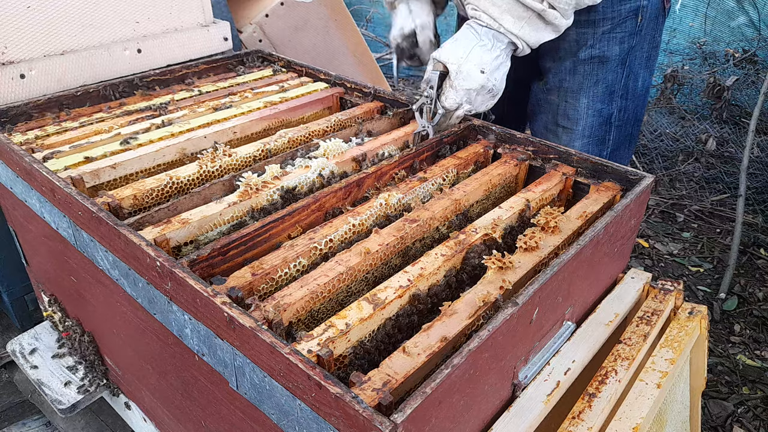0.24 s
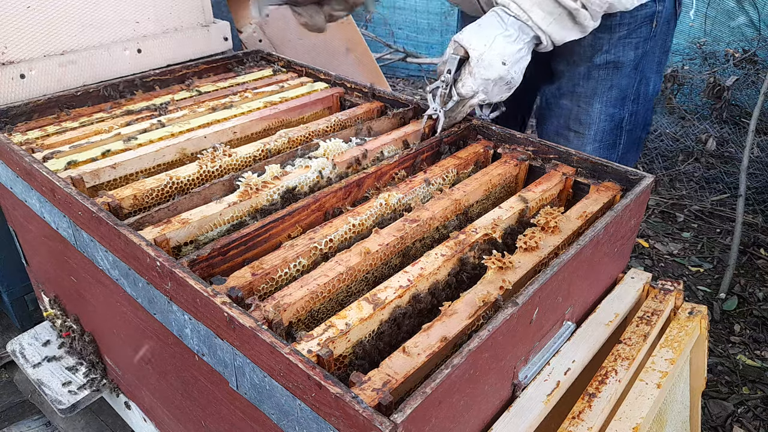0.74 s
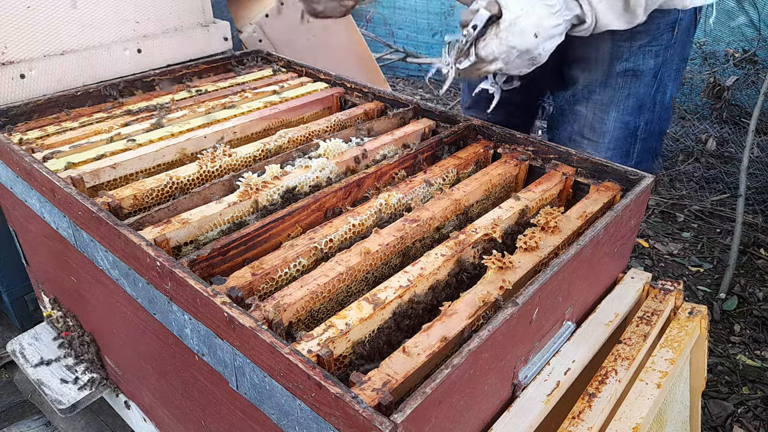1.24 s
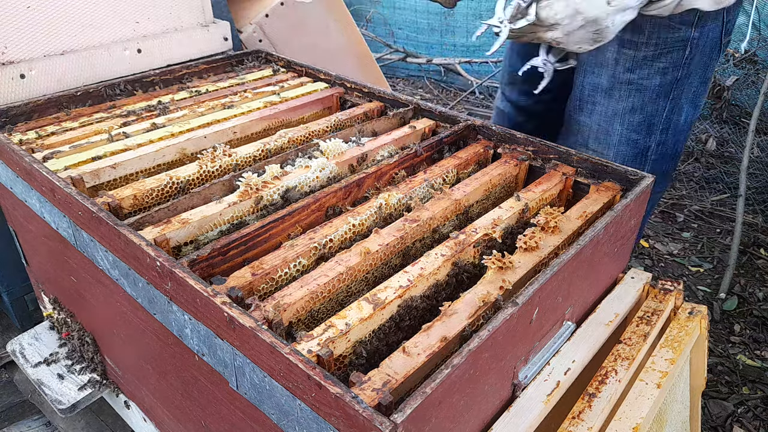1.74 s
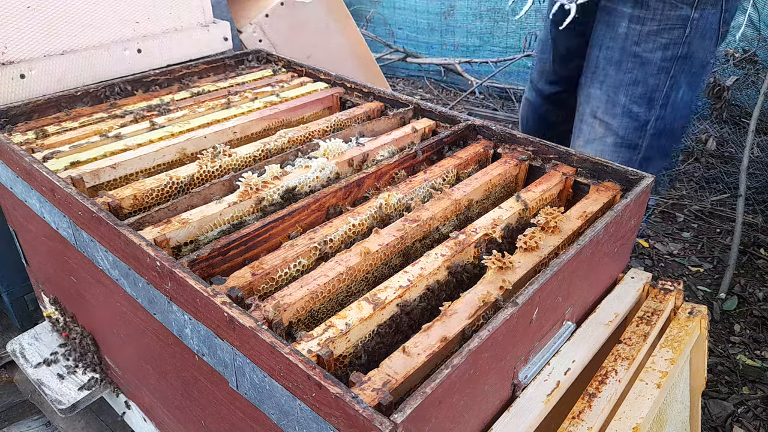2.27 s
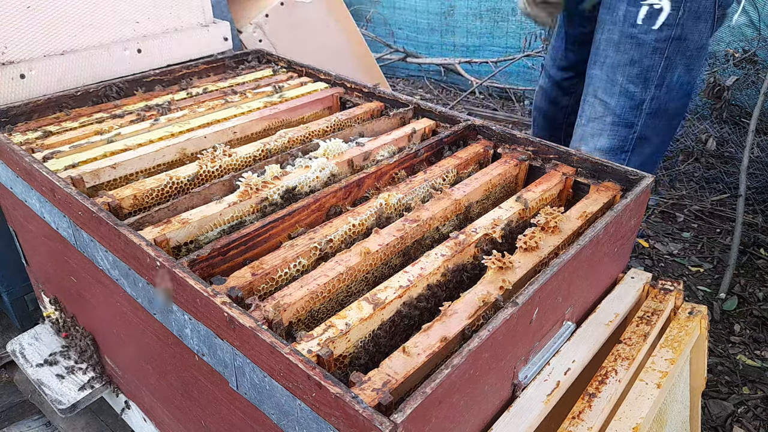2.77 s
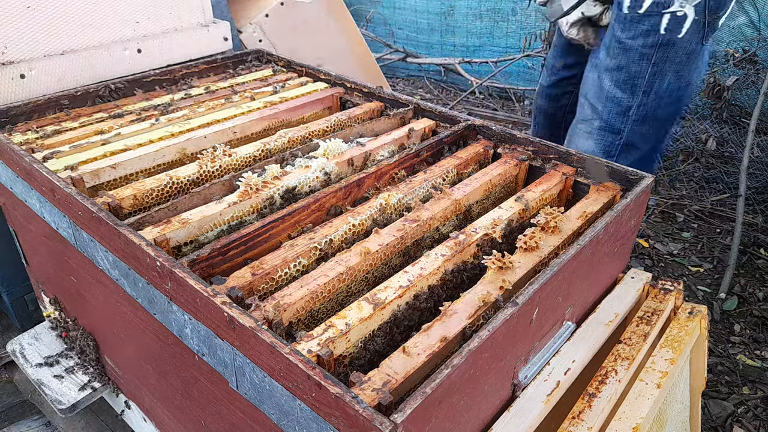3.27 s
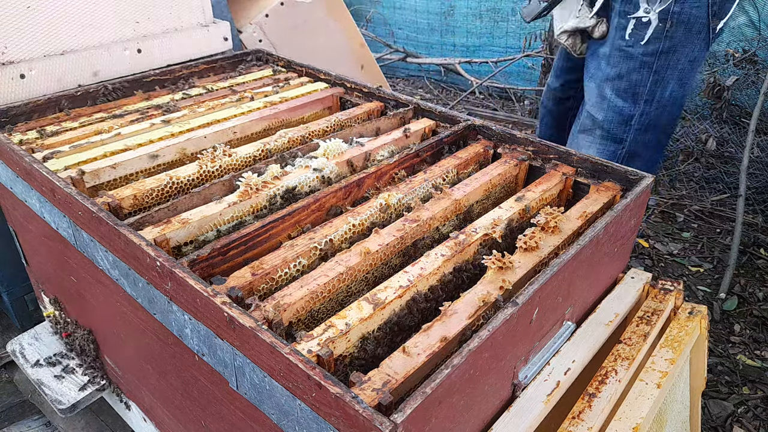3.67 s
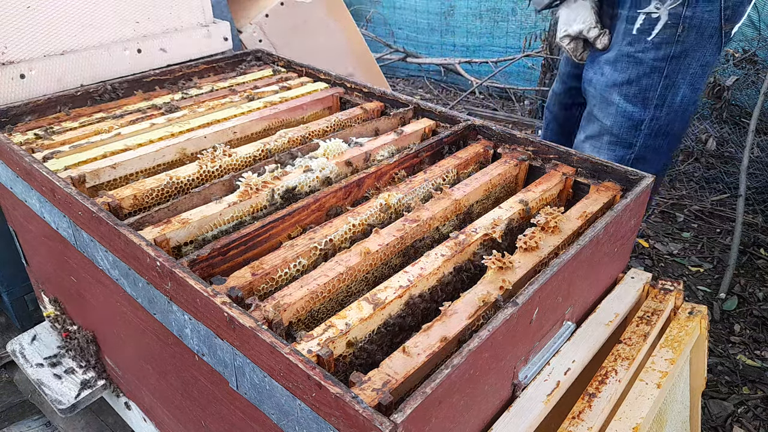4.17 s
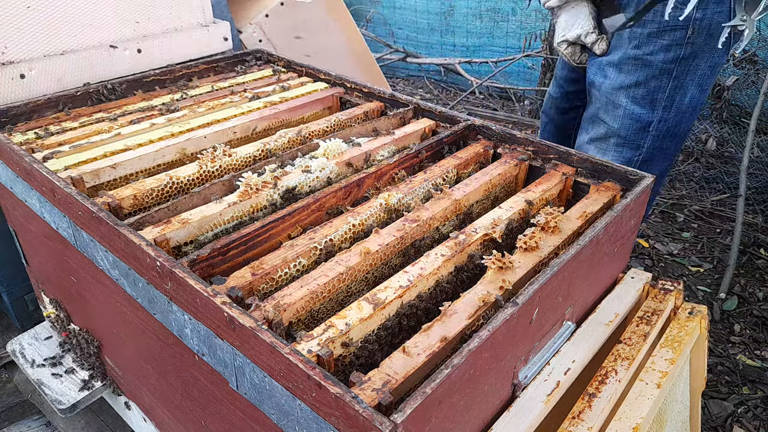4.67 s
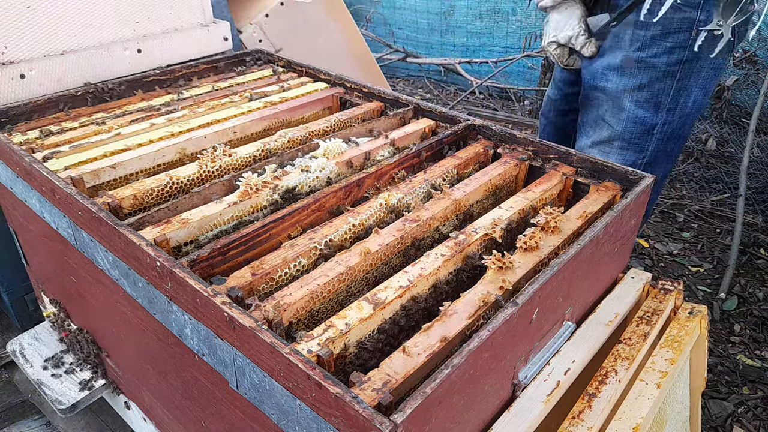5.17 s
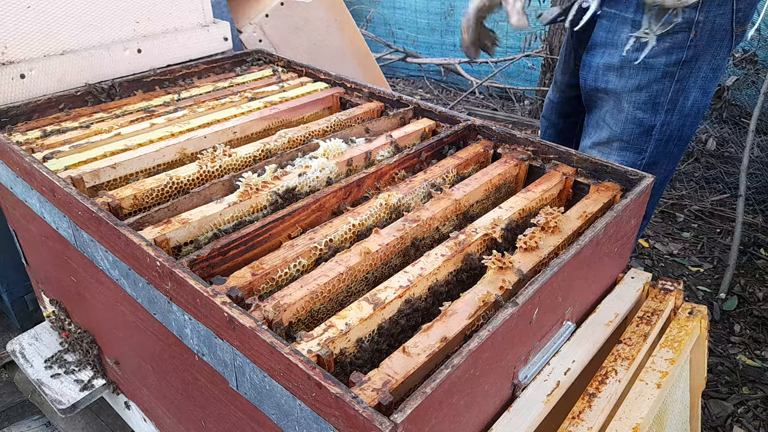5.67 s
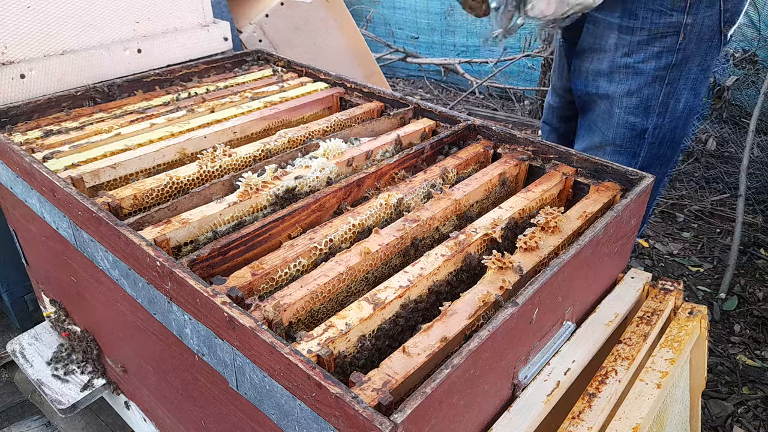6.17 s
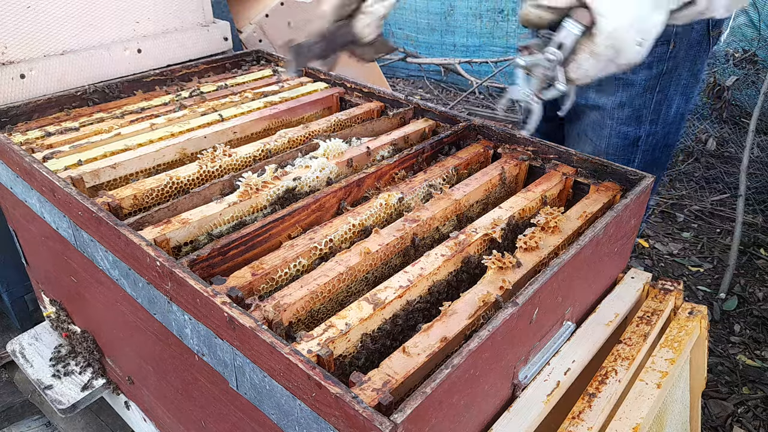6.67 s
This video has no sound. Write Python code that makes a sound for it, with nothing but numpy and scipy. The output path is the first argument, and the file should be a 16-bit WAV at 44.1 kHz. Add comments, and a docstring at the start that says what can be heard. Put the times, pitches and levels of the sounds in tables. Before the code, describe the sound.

Honey bees hum softly and unevenly around an open garden hive throughout, over faint outdoor air and scattered, distant sparrow chirps. At about 0.4 seconds come a few light, dry wooden taps with a faint glove rub. From 1.5 to 2.7 seconds one bee circles very close on the left, her buzz wavering and surging. Wood knocks at 1.7 and, more sharply, at 2.3 seconds. Her wings fan the microphone with short puffs at 2.0 and 2.2 seconds, then a rough, fluttering blast at 2.4, by far the loudest moment. Everything then drops in level for over a second and gradually recovers by about 5 seconds. During the dip, a thinner buzz hovers very faintly on the left. Around 6.4 seconds gloves rub and a steel tool gives a quick cluster of light, bright clinks. The right side sounds muffled throughout.

```python
"""A garden, beside an open hive, on a stereo recorder whose right port is muffled.
The colony hums with many beating wings, sparrows chirp far off and a lone bee hovers a little way away.
The keeper knocks wood and clinks a steel frame grip, gloves rubbing on both.
One bee circles the left microphone port and three times fans it with the wash of her wings.
Her closest pass makes the recorder turn its gain down for over a second."""
import sys
import numpy as np
from scipy import signal
from scipy.fft import rfft, irfft, next_fast_len
from scipy.io import wavfile
from scipy.ndimage import uniform_filter1d, minimum_filter1d

SR = 44100
rng = np.random.default_rng(int(sys.argv[2]) if len(sys.argv) > 2 else 0)


def store_pcm(level_fs):
    """Save levels as 16-bit WAV."""
    pcm = np.round(np.clip(level_fs, -1, 1) * 32767).astype(np.int16)
    wavfile.write(sys.argv[1], SR, np.atleast_2d(pcm).T)


N = 305392
TIME = np.arange(N) / SR


def from_db(db):
    """Decibels to gain."""
    return 10 ** (np.asarray(db) / 20)


def rms_one(x):
    """Scale to unit power."""
    return x / np.sqrt(np.mean(x ** 2) + 1e-20)


def in_time(points):
    """Read a curve of (seconds, value) at every sample."""
    return np.interp(TIME, *np.transpose(points))


def at_hz(points, hz):
    """Read a spectrum on a log-frequency axis."""
    f, value = np.transpose(points)
    return np.interp(np.log(np.maximum(hz, 1)), np.log(f), value)


def colour(x, spectrum):
    """Causal (minimum-phase) filter with a response given as (Hz, dB) points."""
    size = 2 * next_fast_len(N // 2 + 4096)
    gain = from_db(at_hz(spectrum, np.arange(size // 2 + 1) * SR / size))
    cepstrum = irfft(np.log(gain))
    cepstrum[1:size // 2] *= 2
    cepstrum[size // 2 + 1:] = 0
    return irfft(rfft(x, size) * np.exp(rfft(cepstrum)))[..., :N]


def cut(x, hz, kind, order=2):
    """Butterworth low- or high-pass."""
    return signal.sosfilt(signal.butter(order, hz, kind, fs=SR, output="sos"), x + 1e-18)


def drift(rate_hz):
    """Random wandering with spread 1, mostly slower than the given rate."""
    pole = np.exp(-80 * np.pi * rate_hz / SR)   # one step every 40 samples
    slow = signal.lfilter([1], [1, -2 * pole, pole * pole], rng.standard_normal(N // 40 + 2002))[2000:]
    return np.interp(np.arange(N) / 40, np.arange(len(slow)), rms_one(slow))


def garden_air(level_db):
    """Soft outdoor noise all round, alike at both ports in the bass only."""
    # Tone of the air. Each row: frequency in Hz, relative noise density in dB.
    spectrum = [(25, -15), (55, -3), (110, -1), (300, 4), (700, -1), (1300, -2.5), (2200, -11.5),
                (5500, -12), (10000, -16.5), (15500, -14)]
    # Likeness of the ports. Each row: frequency in Hz, left-right correlation.
    likeness = [(60, 0.53), (130, 0.71), (600, 0.78), (1400, 0.068), (3000, .02)]
    white = rfft(rng.standard_normal((2, N)))
    alike = at_hz(likeness, np.arange(white.shape[1]) * SR / N)
    mid = np.sqrt(1 + alike) * white[0]
    side = np.sqrt(1 - alike) * white[1] * [[1], [-1]]
    return from_db(level_db) * rms_one(colour(irfft(mid + side, N), spectrum))


def sparrows(chirp_s, warble, direct_db, echo_db, echo_s):
    """Short wavering downward glides far off, heard mostly by way of fences and trees."""
    # Each row: start in seconds, opening pitch in Hz, relative level in dB.
    chirps = [(.002, 4700, -58), (.241, 4900, -57), (.29, 4050, -55.5), (.585, 4150, -57.5),
              (.62, 3150, -60), (.765, 4155, -50), (.8, 3750, -62), (1.123, 5010, -49.5), (1.36, 4060, -55),
              (1.5, 3970, -51.5), (1.585, 3440, -50.5), (2.771, 4160, -54), (2.84, 3150, -58),
              (2.905, 4950, -51.5), (4.04, 4120, -54), (4.117, 4930, -52), (4.517, 4150, -56),
              (4.675, 3750, -59), (4.778, 4980, -52.5), (5.405, 4850, -56), (6.119, 4950, -60),
              (6.615, 4950, -54.5)]
    song = np.zeros(N)
    waver = 1 + warble * drift(220)
    progress = np.linspace(0, 1, int(chirp_s * SR))
    arch = np.sqrt(np.abs(np.sin(np.pi * progress)))
    for s, start_hz, level_db in chirps:
        span = slice(int(s * SR), int(s * SR) + len(progress))
        fall_hz = 680 * (start_hz / 4090) ** 5.6   # a chirp that starts higher falls much farther
        hz = (start_hz - fall_hz * progress) * waver[span]
        song[span] += from_db(level_db) * arch * np.sin(2 * np.pi * np.cumsum(hz) / SR)
    reflections = rng.standard_normal((2, SR // 2)) * np.exp(-TIME[:SR // 2] / echo_s)
    reflections /= np.sqrt(np.sum(reflections ** 2, axis=1, keepdims=True))
    echoes = signal.fftconvolve(song[None], reflections, axes=1)[:, :N]
    return from_db(direct_db) * song + from_db(echo_db) * echoes


def wing_wave(turns, hz, spectrum, harmonics):
    """Harmonic wave of one pair of wings, read at the running stroke count."""
    k = np.arange(1, harmonics + 1)
    lines = np.zeros(1025, complex)
    lines[k] = from_db(at_hz(spectrum, k * hz)) * np.exp(2j * np.pi * rng.random(harmonics))
    cycle = rms_one(irfft(lines))
    return cycle[(turns * len(cycle)).astype(int) % len(cycle)]


def colony(centre_hz, spread, wander, swell_db, pan_db, bees):
    """Many bees, each on her own wavering pitch, drifting nearer and farther, a little later at one port."""
    # Tone of the bees together. Each row: frequency in Hz, relative level of a harmonic there in dB.
    spectrum = [(190, -4.5), (240, -10.5), (370, -2), (490, 0.5), (600, -12), (1150, -12), (1600, -16),
                (2400, -23), (4000, -27.5)]
    # Activity round the hive. Each row: time in seconds, hum level in dB.
    activity = [(0, -60), (.45, -54), (1.6, -52.5), (1.93, -44), (2.8, -55.5), (3.6, -55.5), (4.6, -52.5),
                (5.05, -57), (5.3, -54), (5.85, -57.5), (6.06, -50.5), (6.25, -55), (6.55, -51)]
    hum = np.zeros((2, N))
    for place in np.linspace(-1, 1, bees):
        hz = centre_hz * np.exp(spread * place)
        turns = np.cumsum(hz * (1 + wander * drift(2.5))) / SR + 1
        offset = np.array([[0], [hz * rng.uniform(-.00042, .0008)]])
        pan = from_db(pan_db * rng.standard_normal((2, 1)))
        buzz = wing_wave(turns + offset, hz, spectrum, harmonics=16)
        hum += buzz * from_db(swell_db * drift(.9)) * pan
    return from_db(in_time(activity)) * rms_one(hum)


def flight_buzz(turns, spectrum, flutter_db, harmonics):
    """One bee's harmonics; as she turns in the air each swells and fades on its own by flutter_db."""
    buzz = np.zeros(N)
    for k in range(1, harmonics + 1):
        level_db = at_hz(spectrum, k * 220) + flutter_db * min(k / 4, 1) * drift(18)
        buzz += from_db(level_db) * np.sin(2 * np.pi * k * turns + k * k)
    return rms_one(buzz)


def aloft(flight):
    """Fade a flight in and out over 50 ms at its ends."""
    start_s, end_s = flight[0][0], flight[-1][0]
    return np.clip((TIME - start_s) * 20, 0, 1) * np.clip((end_s - TIME) * 20, 0, 1)


def lone_bee(start_hz, sag_hz_per_s, jitter, waver, right_db):
    """A thinner buzz over the frames, a little way off to the left; her wingbeat wavers and sags."""
    # Her hovering. Each row: time in seconds, level at the left port in dB.
    hover = [(2.68, -66), (2.95, -60), (3.18, -51.5), (3.26, -75), (3.42, -61), (3.6, -81.5), (3.8, -56.5),
             (3.95, -72)]
    # Her tone, strong in the fifth harmonic. Each row: frequency in Hz, relative level in dB.
    spectrum = [(220, -3), (440, 0), (660, -8), (880, -9), (1090, 1), (1320, -10), (2200, -16), (3500, -26)]
    hz = (start_hz - sag_hz_per_s * (TIME - hover[0][0])) * (1 + waver * drift(3.96))
    turns = np.cumsum(hz * (1 + jitter * drift(30))) / SR
    buzz = flight_buzz(turns, spectrum, flutter_db=0, harmonics=12)
    return aloft(hover) * from_db(in_time(hover)) * buzz * from_db([[0], [right_db]])


def bounced(blows, gap_s, loss_db):
    """Every blow touches a second time, more softly."""
    return blows + [(s + gap_s, level_db - loss_db) for s, level_db in blows]


def strike(blows, modes, scatter_db, crack_db, crack_s, tail_db, tail_s):
    """Each blow rings the modes with random strengths at each port, over a crack and a diffuse tail."""
    out = np.zeros((2, N))
    t = TIME[:SR // 4]
    hz, mode_db, t60 = np.transpose(modes)[:, :, None]
    rings = from_db(-60 * t / t60) * np.sin(2 * np.pi * hz * t)
    grit_envelope = from_db(crack_db) * np.exp(-t / crack_s) + from_db(tail_db) * np.exp(-t / tail_s)
    for s, level_db in blows:
        i = int(s * SR)
        for port in range(2):
            strength = from_db(mode_db + scatter_db * rng.standard_normal(hz.shape))
            ring = (strength * rng.choice([-1, 1], hz.shape) * rings).sum(0)
            grit = rng.standard_normal(len(t)) * grit_envelope
            out[port, i:i + len(t)] += (from_db(level_db) * (ring + grit))[:N - i]
    return out


def wood_knocks():
    """The keeper knocks the hive's woodwork: a dry, short ring with little bass."""
    # Each row: start in seconds, relative level in dB.
    knocks = [(.3682, -38), (.434, -40.5), (.472, -45), (.5632, -44), (1.6828, -25.5), (2.273, -18.5)]
    # Modes of the wood. Each row: frequency in Hz, relative level in dB, seconds to fall 60 dB.
    modes = [(643, -8, 0.01), (980, -18, 0.0028), (1225, 3, 0.0058), (1650, -19, 0.0091), (2440, -6, 0.011),
             (3340, -13, 0.0098), (3860, -7, 0.0058), (5400, -6, 0.0047), (10200, -10, 0.0021),
             (14200, -16, 0.0037)]
    wood = strike(bounced(knocks, gap_s=.005, loss_db=11.5), modes,
                  scatter_db=-3.5, crack_db=-11.5, crack_s=.0043, tail_db=-26.5, tail_s=.02)
    return cut(wood, 250, "high")


def grip_clinks(gain_db):
    """The steel jaws of the frame grip clink and ring brightly, too small to radiate much bass."""
    # Each row: start in seconds, relative level in dB.
    clinks = [(6.4171, -33), (6.431, -30), (6.4714, -26.5), (6.5475, -42.5)]
    # Modes of the steel. Each row: frequency in Hz, relative level in dB, seconds to fall 60 dB.
    modes = [(1980, -1, 0.04), (2150, -7, 0.057), (2740, -14, 0.054), (4120, -3, 0.034), (4700, -15, 0.056),
             (5170, 1, 0.051), (6740, -4, 0.049), (9900, -17, .03), (11800, -2, 0.032), (11500, -16, .05),
             (12460, -1, 0.041), (14600, -6, .04), (14700, -15, .05), (15200, -16, .05)]
    steel = strike(bounced(clinks, gap_s=.0035, loss_db=6.5), modes,
                   scatter_db=2.5, crack_db=9.5, crack_s=.0044, tail_db=-9.5, tail_s=.044)
    return from_db(gain_db) * cut(steel, 820, "high")


def glove_rubs(attack_s, release_s, rough_db):
    """Gloves rub on wood and tool: uneven friction noise that takes hold quickly and lets go."""
    # Each row: start in seconds, length in seconds, relative level in dB.
    rubs = [(.35, .23, -63.5), (2.277, .017, -36.5), (2.311, .06, -51), (6.329, .2, -56.5)]
    envelope = np.zeros(N)
    for s, length_s, level_db in rubs:
        take_hold = np.clip((TIME - s) / attack_s + 1, 0, 1)
        let_go = np.exp(-np.clip((TIME - s - length_s) / release_s, 0, 20))
        envelope += from_db(level_db) * take_hold * let_go
    roughness = from_db(rough_db * drift(80))
    friction = rms_one(cut(rng.standard_normal((2, N)), 6400, "low", order=1))
    return cut(envelope * roughness * friction, 500, "high")


def stirred_air(buzz_db):
    """Level in dB of the air a bee stirs at the port: it grows much faster than her buzz, and lingers."""
    # A brief strong wake and a long faint one. Each row: share in dB, decay in dB per second.
    wakes = [(0, 560), (-21.5, 115)]
    air_db = np.minimum(-15 + 2.96 * (buzz_db + 24), 3)
    trails_db = [share_db + np.maximum.accumulate(air_db + decay * TIME) - decay * TIME
                 for share_db, decay in wakes]
    return np.max(trails_db, axis=0)


def wing_wash(turns, air_db, rough, hiss_db, spurt_turns, eddy_hz, slowing_s, eddy_decay_s):
    """Right at the port every stroke lands as a slap of air with a spurt of turbulence; eddies roll past."""
    # Her wash sweeps the port; the last two rows merge into one pass. Each row: centre in seconds,
    # half length in seconds, slap level in dB, slap low-pass in Hz, eddy level in dB (levels relative).
    passes = [(2.016, 0.0047, -16.5, 1091, -16), (2.158, 0.0083, -19.5, 750, -10.5),
              (2.419, 0.0095, -0.5, 750, -7.5), (2.432, .013, -0.5, 2400, -14)]
    stroke = turns.astype(int)
    force = (1 + rough * rng.standard_normal(stroke[-1] + 1))[stroke]
    pulses = rms_one(np.diff(stroke, prepend=0))
    spurts = rms_one(rng.standard_normal(N) * np.exp(-(turns % 1) / spurt_turns))
    jet = cut(force * (pulses + from_db(hiss_db) * spurts), 280, "high", order=1)
    gusty = np.exp(.2 * drift(90))
    # the fringe of the jet is felt whenever she is near
    wash = from_db(air_db - 16) * rms_one(cut(jet, 1080, "low", order=3))
    for s, half_s, slap_db, bright_hz, eddy_db in passes:
        # its core is narrow and sharp-edged
        off_axis = np.clip((TIME - s) / half_s, -4, 4)
        slaps = rms_one(cut(jet, bright_hz, "low", order=3)) + from_db(-34) * rms_one(jet)
        wash += from_db(slap_db) * np.exp(-off_axis ** 4 / 2) * slaps
        # the eddies follow 1.3 ms behind and turn more slowly as they die
        age = TIME - s - .0013
        rise, after = np.minimum(age, 0) / half_s, np.maximum(age, 0)
        swirl_hz = eddy_hz * gusty * np.exp(-after / slowing_s)
        eddies = np.sqrt(2) * np.sin(2 * np.pi * np.cumsum(swirl_hz) / SR)
        wash += from_db(eddy_db) * np.exp(-np.minimum(rise ** 2 + after / eddy_decay_s, 20)) * eddies
    return wash


def near_bee(jitter, shimmer_db, flutter_db, rush_db, right_db, wind_right_db):
    """A bee at the left port: her second harmonic leads, but within centimetres the fundamental does."""
    # Her buzz, louder the closer she comes. Each row: time in seconds, relative level in dB.
    flight = [(1.55, -45.5), (1.63, -50), (1.69, -37.5), (1.745, -47), (1.84, -32.5), (1.9, -37),
              (1.998, -29.5), (2.016, -20), (2.035, -23.7), (2.1, -26.3), (2.148, -23.7), (2.205, -36),
              (2.38, -35), (2.42, -14), (2.47, -32.5), (2.55, -46), (2.615, -47), (2.675, -60)]
    # Her wingbeat. Each row: time in seconds, stroke rate in Hz.
    wingbeat = [(1.55, 233.4), (1.626, 240), (1.76, 219.3), (1.78, 235.9), (1.846, 205.3), (2.032, 225.6),
                (2.1, 208.4), (2.148, 234.7), (2.202, 206), (2.42, 236.4), (2.454, 208.1), (2.532, 225.1),
                (2.66, 215.6)]
    # The buzz she radiates. Each row: frequency in Hz, relative harmonic level in dB.
    buzz_spectrum = [(220, -17.5), (440, 1), (660, -12.5), (880, -16.5), (1120, -12.5), (1340, -22),
                     (1800, -19), (2300, -24.5), (2900, -40), (4000, -35), (6500, -38.5)]
    # Her near field. Each row: frequency in Hz, relative harmonic level in dB.
    near_spectrum = [(220, 4), (440, -2), (660, -12.5), (900, -20), (1400, -26), (2500, -46.5)]
    # Air rushing off the wings. Each row: frequency in Hz, relative noise density in dB.
    rush_spectrum = [(100, 2.5), (700, -3), (1600, -5), (3000, -8), (5000, -9.5), (9000, -12),
                     (15000, -12.5)]
    buzz_db = in_time(flight)
    air_db = stirred_air(buzz_db)
    turns = np.cumsum(in_time(wingbeat) * (1 + jitter * drift(60))) / SR
    strength = aloft(flight) * from_db(shimmer_db * drift(120))   # no two strokes are equally strong
    rush = colour(rng.standard_normal(N), rush_spectrum) * (.48 + np.cos(np.pi * turns) ** 2)
    tone = flight_buzz(turns, buzz_spectrum, flutter_db, harmonics=22)
    buzz = strength * from_db(buzz_db) * (tone + from_db(rush_db) * rms_one(rush))
    wind = strength * from_db(air_db) * flight_buzz(turns, near_spectrum, flutter_db, harmonics=10)
    wind += wing_wash(turns, air_db, rough=.16, hiss_db=4, spurt_turns=.097,
                      eddy_hz=108, slowing_s=.075, eddy_decay_s=.011)
    ports = buzz * from_db([[0], [right_db]]) + wind * from_db([[0], [wind_right_db]])
    return cut(ports, 48, "high", order=4)


def scene():
    """The bees, the garden and the keeper as they reach the two ports."""
    bees = near_bee(jitter=.012, shimmer_db=1.93, flutter_db=4, rush_db=-16.5,
                    right_db=-40, wind_right_db=-52)
    bees += lone_bee(start_hz=216, sag_hz_per_s=9.6, jitter=.00518, waver=.0138, right_db=-35)
    bees += colony(centre_hz=226.3, spread=.15, wander=.042, swell_db=2, pan_db=1.5, bees=52)
    birds = sparrows(chirp_s=.056, warble=.05, direct_db=-7.5, echo_db=-1.5, echo_s=.065)
    air = garden_air(level_db=-55.5)
    keeper = wood_knocks() + grip_clinks(gain_db=-8.5)
    keeper += glove_rubs(attack_s=.008, release_s=.0047, rough_db=3.7)
    return air + birds + keeper + bees


def gain_control(x, threshold_db, most_held_db, hold_s, release_s):
    """A loud moment on the left turns both channels down; part of that cut is held, then creeps back."""
    power = uniform_filter1d(uniform_filter1d(x[0] ** 2, size=400), size=200)
    over_db = np.maximum(10 * np.log10(np.maximum(power, 1e-12)) - threshold_db, 0)
    half = int(hold_s * SR / 2)
    capped_db = np.minimum(over_db, most_held_db)
    held_db = -minimum_filter1d(-capped_db, 2 * half + 1, origin=half, mode="constant")
    fade = np.exp(-TIME / release_s)
    released_db = np.maximum.accumulate(held_db / fade) * fade
    return x * from_db(-np.maximum(over_db, released_db))


def record(dry):
    """The recorder: muffled right port, gain control, overload, a dip near 8 kHz, a cut at 15.9 kHz."""
    # Response of the muffled port. Each row: frequency in Hz, gain in dB.
    right_port = [(60, -1.5), (200, -2), (700, -3.5), (1290, -6.5), (2380, -15.5), (4400, -20),
                  (6500, -20.5), (8200, -7.5), (15000, -9)]
    x = np.array([dry[0], colour(dry[1], right_port)])
    x = gain_control(x, threshold_db=-5, most_held_db=13.5, hold_s=1.03, release_s=.56)
    x = np.clip(x, -.92, .92)
    x = colour(x, [(5500, -.5), (6600, -3), (7500, -13), (8500, -13.5), (10000, -7.5), (11500, -3)])
    return signal.sosfilt(signal.ellip(10, .1, 70, 15900, fs=SR, output="sos"), x)


dry = scene()
out = record(dry)
store_pcm(out)
```